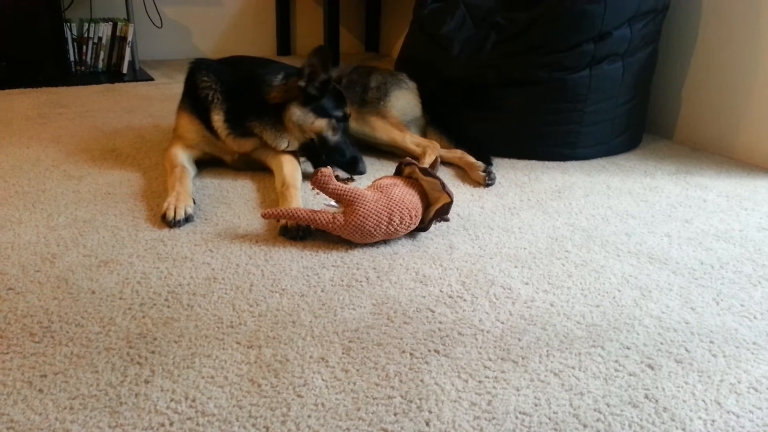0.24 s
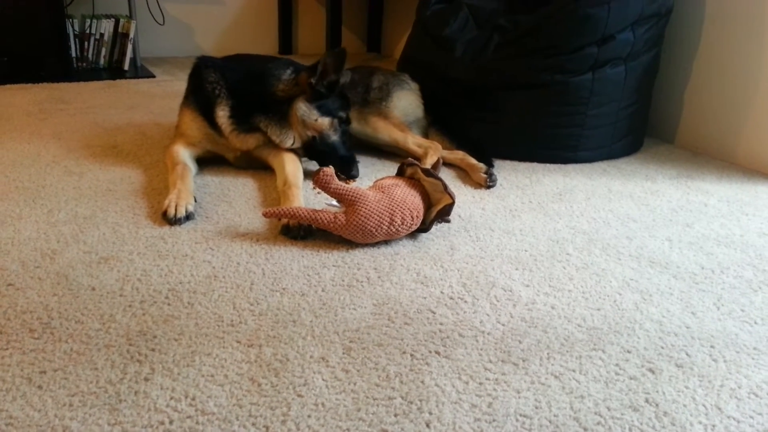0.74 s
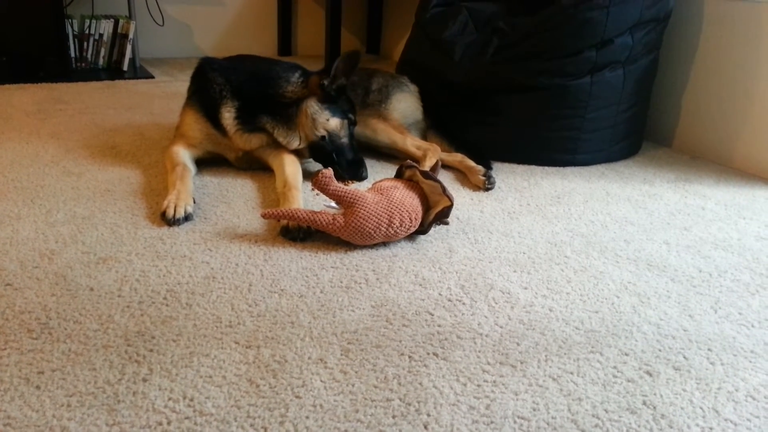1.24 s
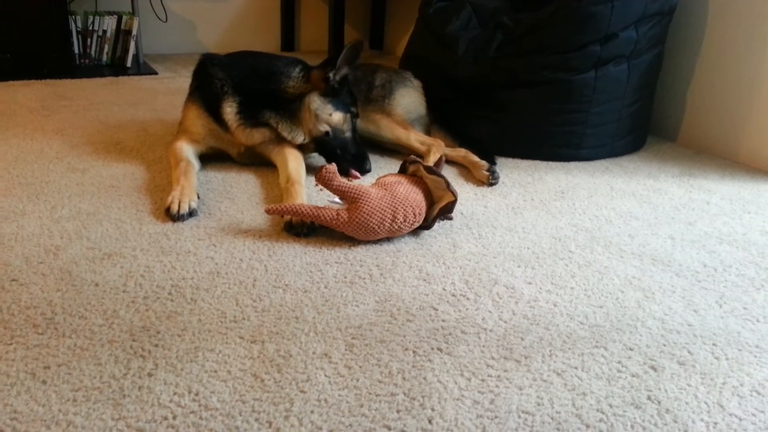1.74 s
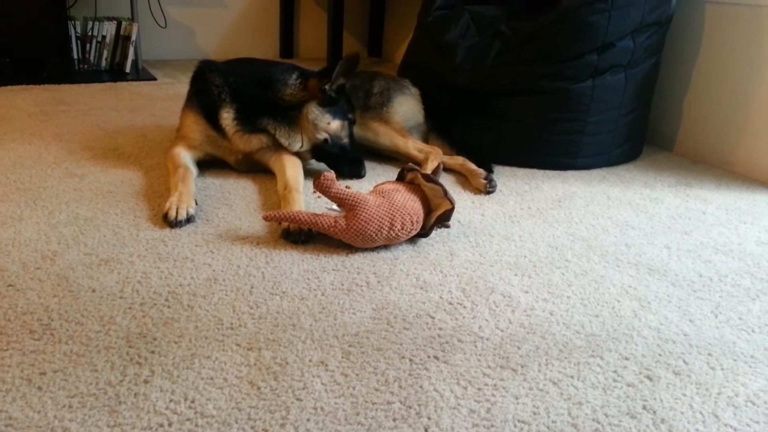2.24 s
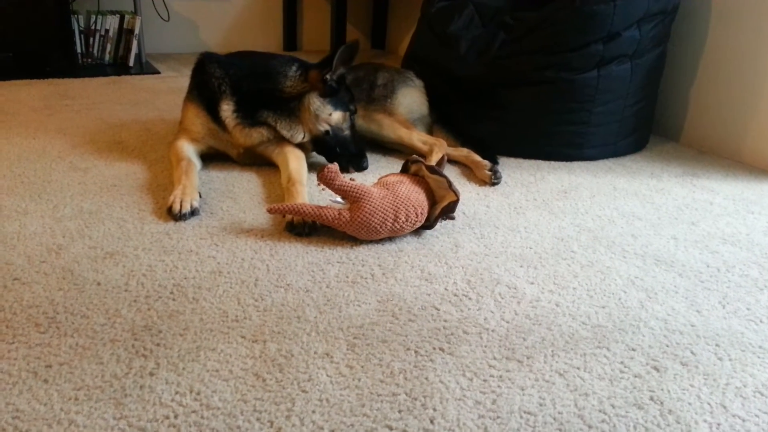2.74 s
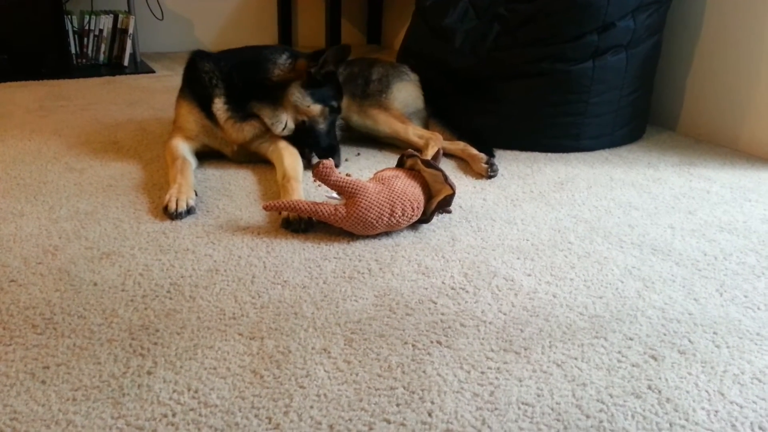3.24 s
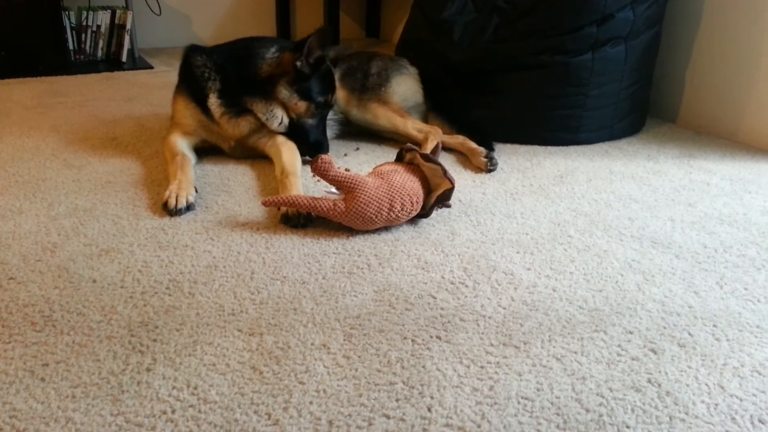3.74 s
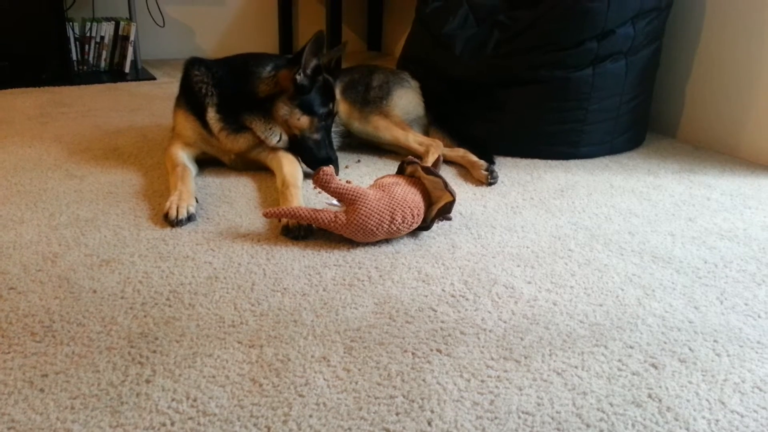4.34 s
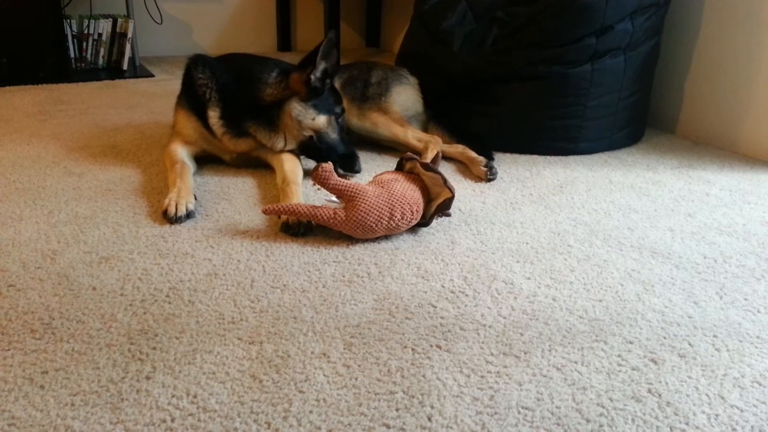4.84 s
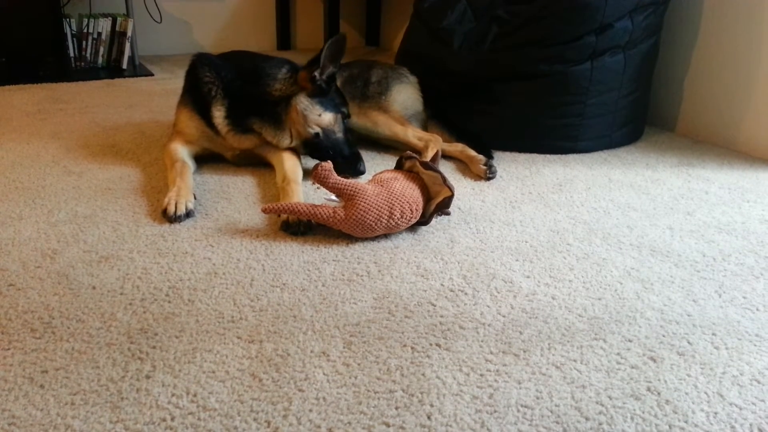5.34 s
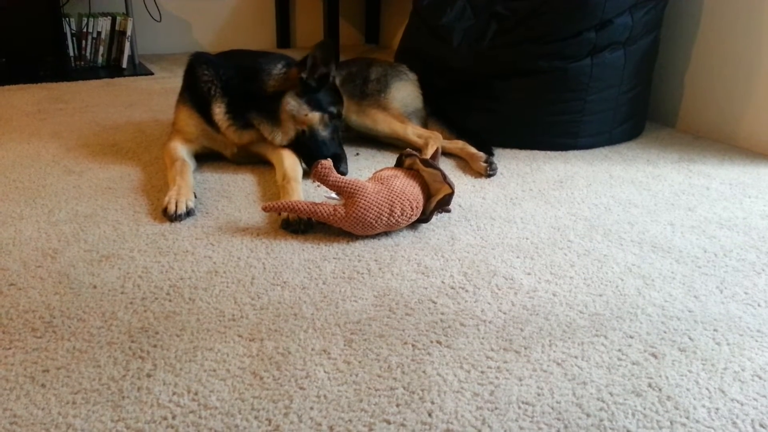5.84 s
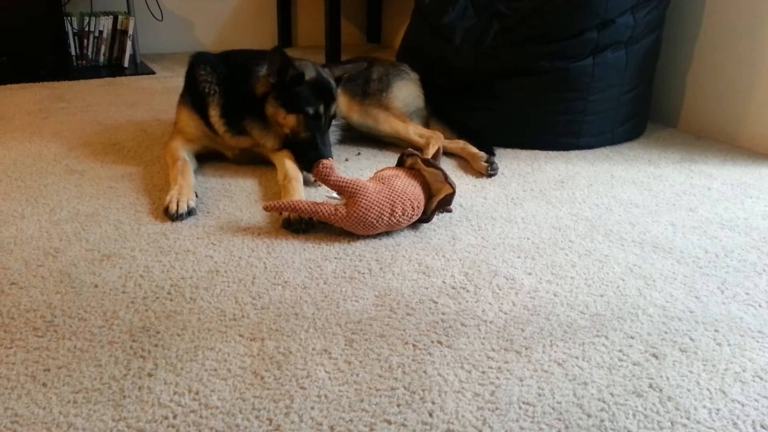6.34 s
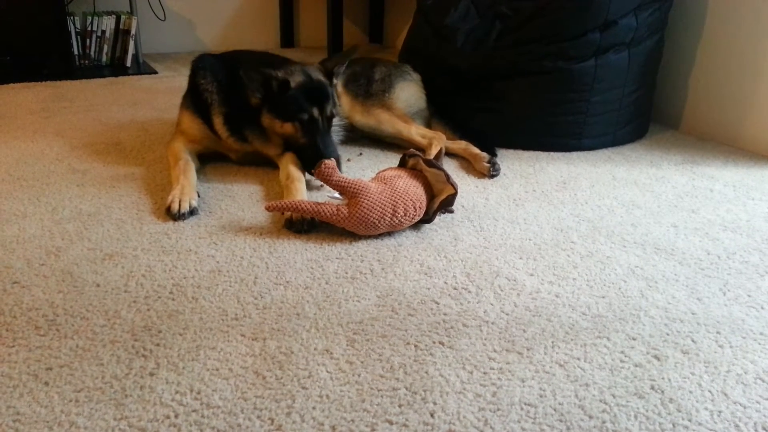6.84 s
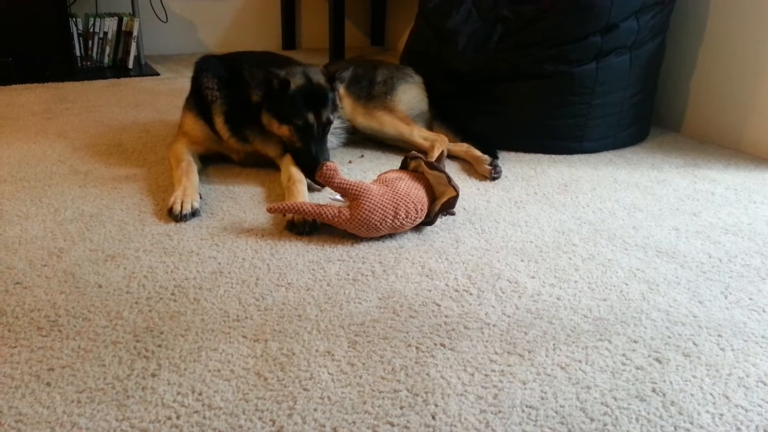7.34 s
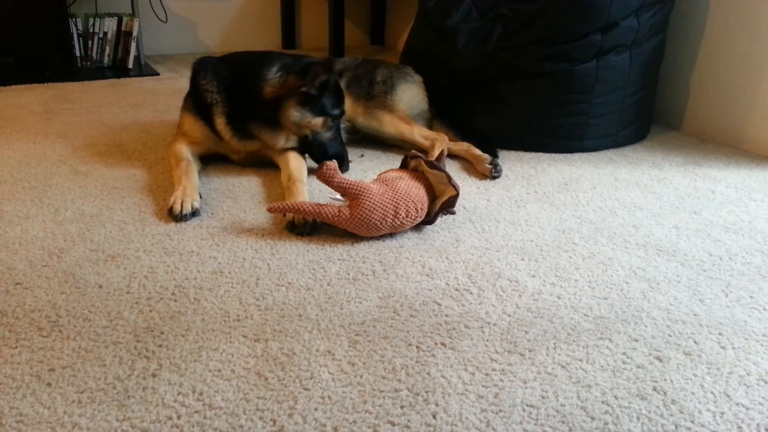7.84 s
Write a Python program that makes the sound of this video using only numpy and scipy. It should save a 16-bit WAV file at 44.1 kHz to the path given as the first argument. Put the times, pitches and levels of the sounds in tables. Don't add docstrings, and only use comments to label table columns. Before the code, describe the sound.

Indoors on carpet, a dog bites hard dry food: a few crisp snaps, then one large piece cracks loudly and crumbles in dense brittle crackle. Afterwards only scattered light clicks and nibbles remain, with soft dull paw or jaw thumps. A low, uneven duct drone and faint hiss lie beneath, sinking later. A phone microphone a little way off hears it, with noise suppression opening around bites.

```python
import sys
import numpy as np
from scipy import signal
from scipy.fft import rfft, irfft
from scipy.io import wavfile
from scipy.ndimage import uniform_filter1d, minimum_filter1d

SR = 44100
rng = np.random.default_rng(int(sys.argv[2]) if len(sys.argv) > 2 else 0)


def store_wav(level_fs):
    pcm = np.round(np.clip(np.atleast_2d(level_fs), -1, 1) * 32767)
    wavfile.write(sys.argv[1], SR, pcm.T.astype(np.int16))


def attenuation_scalar(level_db):
    decades = np.asarray(level_db, float) / 20
    return 10 ** decades


N = 356460

# pitch in Hz, width in Hz, level in dB.
FOOD_BODY = [(1265, 360, -5), (2385, 750, -4), (3460, 830, -4.5), (4500, 1300, -0.8), (6500, 1100, -3),
             (9900, 9800, -9.5)]
HOLLOW_MODES, BRIGHT_MODES = FOOD_BODY[:2], FOOD_BODY[2:]
# start in seconds,
# peak in dB, ring in Hz, breadth in dB, knock in dB.
CRACKS = [(0.4444, -21, 4910, -3, -8), (0.4789, -39, 2890, -4, 0), (0.4841, -35, 2200, -4, -3),
          (0.599, -19, 7880, 2, -8), (0.6029, -27, 5510, -3, -7), (0.6082, -23, 4610, -1, -12),
          (0.6436, -37, 8140, -5, -14), (0.6475, -36, 7360, -3, -14), (0.7057, -30, 2200, 1, -7),
          (0.7204, -26, 5250, -11, -16), (0.7236, -18, 7190, 1, -25), (0.7381, -25, 4820, 1, -14),
          (0.7574, -24, 7360, 0, -20), (0.7652, -22, 2630, -2, -5), (0.7719, -15, 3830, -5, -13),
          (0.7824, -28, 5170, -11, -14), (0.785, -19, 7190, -4, -20), (0.7948, -11, 6240, -2, -23),
          (0.8012, -15, 3920, -1, -15), (0.8072, -29, 7710, 0, -9), (0.8276, -29, 6630, -1, -21),
          (0.8422, -32, 4780, -10, -16), (0.8992, -43, 2330, -16, -2), (0.9363, -44, 3750, -12, -8),
          (0.9848, -41, 6850, -6, -19), (1.0401, -47, 6850, -1, -10), (1.5448, -16, 8140, -2, -16),
          (1.5527, -39, 5640, -7, -16), (1.5595, -38, 6240, -4, -14), (1.6433, -48, 6890, 0, -9),
          (1.7756, -32, 8610, -13, -15),
          (1.8052, -24, 7410, -3, -11), (1.8112, -19, 7020, -1, -19), (1.8237, -22, 5040, -5, -13),
               (1.8273, -24, 7490, -6, -18), (1.8457, -29, 5470, 2, -12), (1.8515, -27, 7490, 0, -15),
               (1.876, -21, 5300, 0, -12), (1.8814, -22, 7150, -4, -14), (1.89, -17, 5990, -2, -12),
               (1.8982, -10, 4440, -4, -18), (1.9077, -18, 4480, -5, -11), (1.9543, -17, 5120, -6, -20),
               (1.9604, -17, 5250, -7, -17), (1.9894, -6, 5040, -4, -20), (2.0001, -15, 4910, -5, -15),
               (2.0041, -12, 4820, -10, -19), (2.0087, -14, 4690, -12, -15), (2.0128, -10, 7110, 0, -19),
               (2.0178, -13, 4180, -4, -14), (2.0267, -5, 7110, -2, -20), (2.0443, -8, 4260, -1, -11),
               (2.0585, -14, 4650, -7, -18), (2.064, -6, 7150, 1, -12), (2.0696, -10, 4690, -4, -10),
               (2.0767, -7, 6930, -1, -20), (2.0851, -15, 2370, -4, -5), (2.1147, -9, 5600, 1, -19),
               (2.1212, -16, 7110, -5, -26), (2.1255, -20, 5040, -6, -13), (2.1496, -2, 5470, -3, -28),
               (2.1595, -20, 5380, -6, -19), (2.1676, -21, 7150, 0, -20), (2.1741, -10, 4520, -3, -11),
               (2.185, -24, 6200, -3, -20),
          (2.2212, -28, 4130, -6, -8), (2.2292, -17, 5120, -4, -8), (2.2353, -32, 6720, 0, -14),
             (2.2636, -18, 4570, -17, -23), (2.2782, -21, 4690, -14, -18), (2.2864, -33, 5210, -10, -14),
             (2.2993, -20, 7110, 1, -15), (2.3048, -18, 3920, 1, -7), (2.3126, -33, 5300, -14, -12),
             (2.3225, -20, 5000, -4, -15), (2.3304, -32, 5210, -9, -15), (2.3648, -37, 2450, -7, 1),
             (2.3763, -22, 7670, -1, -20), (2.3943, -38, 3060, -7, -4), (2.4143, -22, 6930, 0, -15),
             (2.4519, -15, 4310, -7, -17), (2.4602, -35, 5380, -13, -13), (2.4638, -22, 5040, -4, -12),
             (2.4725, -35, 4950, -12, -17), (2.4802, -24, 6980, -2, -18), (2.5012, -19, 5380, 1, -6),
             (2.5044, -23, 2370, -5, -3), (2.509, -30, 2330, -5, -2), (2.513, -25, 6630, 0, -14),
             (2.5229, -21, 7360, -1, -15), (2.5302, -30, 6800, -3, -7), (2.5462, -28, 5170, 1, -10),
             (2.5603, -15, 6890, -5, -18), (2.5682, -34, 5470, -7, -16), (2.5794, -22, 6980, 1, -13),
             (2.5908, -16, 5380, -1, -19), (2.5943, -21, 5000, 0, -16), (2.5976, -23, 3830, -3, -13),
             (2.627, -29, 7020, -2, -20), (2.6303, -31, 7020, -6, -11), (2.6499, -35, 2020, 0, -7),
             (2.6689, -35, 7920, 1, -9),
          (2.8338, -23, 4050, 1, -6), (2.9397, -46, 7060, -3, -17), (3.0934, -28, 4910, -2, -6),
               (3.0967, -41, 6800, -6, -10), (3.2098, -39, 6420, -3, -16), (3.8014, -41, 7880, -3, -11),
               (3.9496, -35, 6160, -4, -17), (3.9547, -32, 7710, -7, -18), (4.0169, -45, 7190, -3, -17),
               (4.2898, -49, 7920, -3, -8), (5.0858, -43, 8350, -3, -15), (5.1653, -44, 5430, -4, -11),
               (5.2358, -46, 5730, -8, -3), (5.302, -33, 5770, -3, -12), (5.3056, -33, 5680, -6, -13),
               (5.321, -38, 5680, -3, -12), (5.334, -41, 6550, -7, -16), (5.3379, -42, 6720, -2, -11),
               (5.3414, -38, 5940, -9, -15), (5.3454, -42, 5770, -9, -13), (5.3716, -40, 5640, -16, -20),
               (5.3745, -45, 5510, -9, -15), (5.3892, -40, 5430, -13, -18),
          (5.6231, -44, 7410, -5, -17), (5.6464, -44, 8180, -2, -16), (5.9328, -33, 7320, -4, -21),
               (5.9442, -42, 8050, -3, -11), (6.0779, -36, 6500, -13, -27), (6.0909, -46, 6330, -6, -11),
               (6.1794, -48, 2020, -8, -3), (6.2374, -48, 6460, -7, -19), (6.3641, -45, 8350, -1, -15),
               (6.5236, -51, 6630, -2, -14), (6.5924, -33, 6500, -9, -11), (6.6003, -42, 5770, -8, -7),
               (6.7356, -37, 3920, -2, -11), (6.7446, -38, 8100, -2, -4), (6.7868, -43, 4010, -9, -15),
               (6.7948, -39, 3100, -1, -5), (6.8588, -21, 4010, -6, -13), (6.865, -36, 7110, 0, -19),
               (6.9811, -47, 7840, -5, -19), (7.2657, -33, 4650, -9, -12), (7.2707, -32, 4650, -13, -23),
               (7.2757, -35, 6240, -12, -15), (7.2866, -40, 4870, -14, -16), (7.65, -43, 8440, -2, -19),
               (8.0653, -34, 6800, -13, -24),
          (.754, -27, 7600, -3, -18), (1.5432, -26, 7700, -4, -20), (2.147, -20, 7200, -3, -25),
         (2.151, -7, 3400, -8, -28), (3.0955, -30, 10500, -6, -25), (5.3047, -36, 11000, -6, -25)]


def cracks(width_hz=2700, bright_db=-5.5, narrows=.4, knock_db=-0.8):
    rise_s, splinter_s, tail_s, tail_db = .0007, .0006, .009, -32
    length = 1300
    t = np.arange(length) / SR
    out = np.zeros((2, N + 4096))
    events = CRACKS
    for s, peak_db, hz, breadth_db, hollow_db in events:
        noise = rng.standard_normal((2, length))
        breaks = rng.random((2, length)) < .3
        tail = attenuation_scalar(tail_db) * noise * np.exp(-t / tail_s)
        splinters = noise * breaks * np.exp(-t / splinter_s) + tail
        splinters = splinters * (1 - np.exp(-t / rise_s))
        energy = np.sum(splinters ** 2, axis=1, keepdims=True)
        splinters = pair(splinters / np.sqrt(energy), 0.35)

        wide = width_hz * attenuation_scalar(narrows * breadth_db)
        ring = resonate(resonate(splinters, hz, wide), hz, wide)
        bright = attenuation_scalar(bright_db + breadth_db) * body(splinters, BRIGHT_MODES)
        sharp = shaded(ported(ring + bright))
        knock = hollow(pair(splinters[::-1], 0.7))
        crack = sharp / np.abs(sharp.mean(axis=0)).max()
        crack = crack + attenuation_scalar(hollow_db + knock_db) * knock / np.abs(knock).max()
        at = round((s - .4 * rise_s) * SR)
        out[:, at:at + length] += attenuation_scalar(peak_db - 0.7) * crack
    band = signal.butter(3, [950, 14800], "band", fs=SR, output="sos")
    return signal.sosfilt(band, out[:, :N])


def crackle(level_db, deep_db, clump_db=2.4, shift_db=2.2):
    per_s, uneven_db = 9000, 3
    sizes = attenuation_scalar(uneven_db * np.minimum(rng.exponential(1, (2, N)), 4))
    sizes = sizes * rng.choice([-1, 1], (2, N))
    clumps = attenuation_scalar(clump_db * drift(150))
    grains = clumps * sizes * (rng.random((2, N)) < per_s / SR) + 1e-18
    rung = attenuation_scalar(3.5 + deep_db + shift_db * drift(1200)) * hollow(pair(grains, 0.8))
    for k, (hz, width_hz, db) in enumerate(BRIGHT_MODES):
        gain = attenuation_scalar(db + deep_db * (hz < 5500) + shift_db * drift(2500))
        alike = np.clip(1.3 - hz / 4000, 0, 1)
        rung += (-1) ** k * gain * resonate(pair(grains, alike), hz, width_hz)
    band = signal.butter(8, [1000, 13000], "band", fs=SR, output="sos")
    rung = signal.sosfilt(band, shaded(ported(rung)))
    return attenuation_scalar(level_db - 9.2) * rms_one(rung)


# start in seconds, held time in seconds, crackle in dB, suppressor opening in dB.
BITES = [(-.011, .04, -40, 6), (0.309, 0.031, -51, 8.5), (.441, .04, -44, 12), (0.59, 0.071, -29.5, 13.5),
         (.701, .145, -31, 19), (.94, 0.14, -52, 4.5), (1.53, 0.057, -50, 11.5), (1.63, 0.02, -58, 3.5),
         (1.775, .56, -57, 12), (2.456, .23, -60, 6), (2.831, 0.037, -57, 6), (3.088, 0.027, -56, 6),
         (3.2, 0.032, -58, 9), (3.58, 0.023, -64, 6.5), (3.791, 0.024, -53, 10), (3.941, 0.016, -46, 8),
         (4.01, 0.025, -66, 0.5), (4.289, 0.026, -66, 5.5)]
NIBBLES = [(5.07, .028, -65, 9), (5.159, 0.1, -57, 16), (5.289, 0.11, -57, 14), (5.59, 0.063, -63, 12.5),
           (5.922, 0.038, -48, 15), (6.02, .021, -71, 4), (6.075, 0.029, -53, 12.5), (6.16, 0.083, -70, 8),
           (6.35, .023, -72, 8), (6.44, .026, -73.5, 3.5), (6.52, 0.026, -68, 12), (6.589, 0.03, -48, 19),
           (6.718, .085, -41, 15), (6.837, 0.06, -57, 14.5), (6.97, 0.027, -58, 10.5),
           (7.25, .075, -46, 14), (7.379, 0.026, -68, 1), (7.54, 0.023, -70.5, 0.5), (7.631, 0.077, -68, 7),
           (8.051, .042, -50, 11.5)]
# time in seconds, crackle in dB, depth in dB.
CRUNCH = [(1.76, -62, -6), (1.79, -40, -3), (1.81, -24, -2), (1.858, -31, 0), (1.888, -18, 0),
          (1.98, -16, 0), (2.05, -12, 0), (2.1, -20, 1), (2.14, -27, 0)]
GIVING_WAY = [(2.2, -30, -2), (2.25, -38, -1), (2.33, -38, -1), (2.37, -44, 0), (2.444, -50, -1),
              (2.456, -37, 0), (2.6, -36, -2), (2.7, -50, -3), (2.81, -71, 0)]


def pressure_db(swing_db):
    close_s, give_db_per_s, let_go_db_per_s = .012, 130, 600
    rest_db, rest_follows = -64.5, .9
    t = np.arange(N) / SR
    crunching = (t > CRUNCH[0][0]) * (t < GIVING_WAY[-1][0])
    gain = attenuation_scalar(rest_db + rest_follows * swing_db)
    gain = gain + attenuation_scalar(in_time(CRUNCH + GIVING_WAY)[0]) * crunching
    for s, held, db, _ in BITES + NIBBLES:
        span = slice(max(int(s * SR), 0), int((s + held + .2) * SR))
        since = t[span] - s
        give_db = give_db_per_s * np.maximum(since - close_s, 0)
        let_go_db = let_go_db_per_s * np.maximum(since - held, 0)
        gain[span] += attenuation_scalar(db - (give_db + let_go_db)) * np.clip(since / close_s, 0, 1) ** 2
    return 20 * np.log10(gain)


# time in seconds, depth in dB.
DEPTHS = [(.02, -9), (.33, -2), (.63, 0), (.78, 1.5), (1.57, -5), (5.34, -3), (5.94, -4), (6.09, -4),
          (6.61, 0), (6.76, 0), (6.88, 0), (7.29, 2), (8.07, -4)]


def depth_db():
    started = np.arange(N) / SR > CRUNCH[0][0]
    return in_time(CRUNCH + GIVING_WAY)[1] * started + bells(*np.transpose(DEPTHS), .04)


def hollow(x):
    return sum(attenuation_scalar(db) * resonate(resonate(x, hz, w), hz, w) for hz, w, db in HOLLOW_MODES)


# start in seconds, pitch in Hz, level in dB.
THUMPS = [(.7, 700, -51.5), (.79, 380, -65), (2.03, 350, -48.5), (2.635, 380, -46), (3.789, 383, -53),
          (5.28, 508, -57), (5.589, 630, -65), (6.171, 380, -56.5), (6.182, 724, -75), (6.44, 405, -66.5),
          (7.385, 397, -64), (7.545, 402, -65.5), (7.95, 294, -61)]


def thumps(rise_s=0.0048, fall_s=0.024, width_hz=220):
    length = 6000
    t = np.arange(length) / SR
    swell = (1 - np.exp(-t / rise_s)) * np.exp(-t / fall_s)
    out = np.zeros((2, N + 8192))
    for s, hz, db in THUMPS:
        puff = rms_one(resonate(pair(rng.standard_normal((2, length)), .7), hz, width_hz))
        at = round(s * SR)
        out[:, at:at + length] += attenuation_scalar(db + 8) * puff * swell
    return out[:, :N]


# pitch in Hz, width in Hz, level in dB.
ROOM_MODES = [(36.04, 31, -22), (69, 35, -11), (108, 16, -3.5), (143, 32, -8), (180, 16, -10.5),
              (208, 15, -10), (246, 28, -10.5), (289.4, 27, -15)]
# time in seconds, level in dB.
NEIGHBOURS = [(0, -5), (.6, -4), (.85, 1), (1.1, -3), (1.8, -2), (2.1, 1), (3.2, 1), (3.5, -5), (4.8, -7),
              (5.2, 0), (8.08, 0)]
FULL_FLOW_DB = -58


def drone(swing_db, low_gust_db, upper_gust_db, rumble_db):
    low_db = -55.5 + .85 * swing_db + low_gust_db
    flow_upper_db = -48.5 + 1.26 * swing_db
    upper_db = flow_upper_db + upper_gust_db
    beside_db = flow_upper_db - 4.0 + in_time(NEIGHBOURS)[0] + .3 * upper_gust_db
    deepest_db = rumble_db - 9.0 + .5 * (rumble_db - FULL_FLOW_DB)

    air = pair(rng.standard_normal((2, N)), 0.91)
    rung = [attenuation_scalar(db) * rms_one(resonate(resonate(air, hz, w), hz, w)) for hz, w, db in ROOM_MODES]
    deepest = attenuation_scalar(deepest_db) * rms_one(rung[0])
    low = attenuation_scalar(low_db + 1.46) * rms_one(sum(rung[1:4]))
    beside = attenuation_scalar(beside_db) * rms_one(rung[4] + rung[6] + rung[7])
    blade_air = .55 * rms_one(rung[5])
    upper = attenuation_scalar(upper_db - 2.5) * rms_one(blade_air + fan())
    return deepest + low + beside + upper


def fan():
    fan_hz, wander_hz, level_db = 207.5, 4, -1.5
    turns = np.cumsum(fan_hz + wander_hz * drift(2500)) / SR
    return np.sqrt(2) * attenuation_scalar(level_db + 2.2 * drift(2000)) * np.sin(2 * np.pi * turns)


# time in seconds, low drone gain in dB, upper drone gain in dB.
GUSTS = [(.05, -2, -5), (.2, 1.5, -11), (.43, -1, 4), (.58, 3, 5), (.86, 1, -7), (1.03, 0, 3),
         (1.1, -4, -4), (1.19, 6, -1.5), (1.3, -2, -5), (1.46, 2, 2), (1.73, 1, -7.5), (1.9, -2, -5),
         (2.3, 1, -5), (2.53, -3, 4), (2.63, 2, -5), (3.25, 3, 5), (3.34, -7, -8), (3.41, -2, 4),
         (3.45, 5, -6), (3.49, -7, 6), (3.56, 0, -6), (3.69, 6, 3), (3.981, 3.5, -4), (4.16, 3.5, 4),
         (4.27, -2, 3.5), (4.36, -6, 2), (4.47, -8, -6), (4.62, 5, 4), (4.68, 4, 3), (4.77, -3, -6),
         (4.88, 5, 1), (4.96, -4, -5), (5.29, 2, 3), (5.745, 12, 5), (5.93, 5, 0.5), (6.2, 4, 4),
         (6.62, 12.5, 4.5), (6.86, 10.5, 2.5), (7.23, 8, -1), (7.29, 6.5, 11)]


def gusts_db():
    gust_s = 0.03
    s, low_db, upper_db = np.transpose(GUSTS)
    return bells(s, low_db, gust_s), bells(s, upper_db, gust_s)


# frequency in Hz, level in dB per Hz.
RUMBLE = [(180, -31), (300, -1), (392, -6), (539, -5.5), (676, -9.5), (822, -10.5), (3500, -32),
          (4550, -52.5), (7700, -120)]


def rumble(rumble_db, opened_db):
    return attenuation_scalar(rumble_db + 3.0 + 0.34 * opened_db) * coloured(RUMBLE, 0.55)


# frequency in Hz, level in dB per Hz.
HISS = [(410, -30.5), (700, -4), (2140, -9), (5900, -14), (7900, -15.5), (11000, -12), (14500, -15),
        (16000, -19.5)]


def hiss(swing_db, opened_db):
    rest_db, follows = -79.5, 0.49
    level_db = rest_db + follows * np.minimum(swing_db, 0) + 12.5 + opened_db
    return ported(attenuation_scalar(level_db) * coloured(HISS, 0.026))


def whine():
    hz, level_db, fade_db_per_s, ends_s = 10002, -78.5, .7, 4.05
    t = np.arange(N) / SR
    wobble = attenuation_scalar(1.5 * drift(1500))
    level = attenuation_scalar(level_db - fade_db_per_s * t) * (t < ends_s)
    return np.sqrt(2) * level * wobble * np.sin(2 * np.pi * hz * t)


# time in seconds, air flow in dB.
LET_THROUGH = [(0, -57.5), (1.1, -58), (2.02, -53.5), (3.87, -57), (4.34, -59), (4.48, -66.5), (4.55, -58),
               (4.88, -63), (5.04, -68), (5.29, -67), (5.5, -72), (5.87, -73), (6.5, -72.5), (6.86, -68),
               (7.16, -75), (7.3, -71.5), (7.79, -72), (8.08, -66.5)]


def let_through_db():
    return in_time(LET_THROUGH)[0]


def suppressor_db():
    open_s, close_s, sag_per_s = .008, .016, 2.5

    def opening(t):
        total = 0
        for s, held, _, db in BITES + NIBBLES:
            sag = sag_per_s * np.clip(t - s, 0, held)
            closing = np.maximum(t - s - held, 0) / close_s
            total = total + db * np.clip((t - s) / open_s, 0, 1) * np.exp(-sag - closing)
        return total

    return smooth(opening)


# pitch in Hz, width in Hz, level in dB.
PORTS = [(5200, 2400, 4), (7136, 990, 10.5)]


def ported(stereo):
    return np.array([x + attenuation_scalar(db) * resonate(x, hz, w) for x, (hz, w, db) in zip(stereo, PORTS)])


def shaded(x, cut_hz=6000):
    left = signal.lfilter(*signal.butter(1, cut_hz, fs=SR), x[0])
    return np.array([left * attenuation_scalar(0.5), x[1]])


def resonate(x, hz, width_hz):
    r = np.exp(-np.pi * width_hz / SR)
    b = (1 - r * r) / 2 * np.array([1, 0, -1])
    return signal.lfilter(b, [1, -2 * r * np.cos(2 * np.pi * hz / SR), r * r], x)


def body(x, modes):
    return sum((-1) ** k * attenuation_scalar(db) * resonate(x, hz, w) for k, (hz, w, db) in enumerate(modes))


def pair(draw, alike):
    alike = np.clip(alike, 0, 1)
    opposed = draw[1] * np.array([[1], [-1]])
    return np.sqrt(1 + alike) * draw[0] + np.sqrt(1 - alike) * opposed


def coloured(spectrum, alike):
    hz, db = np.transpose(spectrum)
    grid = np.maximum(np.arange(N // 2 + 1) * SR / N, 1)
    shape = attenuation_scalar(np.interp(np.log(grid), np.log(hz), db))
    noise = pair(rng.standard_normal((2, N)), alike)
    return rms_one(irfft(rfft(noise) * shape, N))


def drift(span):
    return rms_one(uniform_filter1d(rng.standard_normal(N), size=span))


def rms_one(x):
    return x / np.sqrt(np.mean(x ** 2) + 1e-20)


def in_time(rows):
    s, *columns = np.transpose(rows)
    return [np.interp(np.arange(N) / SR, s, c) for c in columns]


def smooth(shape):
    t = np.arange(0, N + 32, 32) / SR
    return np.interp(np.arange(N) / SR, t, shape(t))


def bells(s, db, width_s):
    return smooth(lambda t: sum(d * np.exp(-.5 * ((t - at) / width_s) ** 2) for at, d in zip(s, db)))


def scene():
    flow_db = let_through_db()
    swing_db = flow_db - FULL_FLOW_DB
    opened_db = suppressor_db()
    low_gust_db, upper_gust_db = gusts_db()
    food = thumps() + cracks() + crackle(pressure_db(swing_db), depth_db())
    rumble_db = flow_db + 0.35 * low_gust_db
    air = drone(swing_db, low_gust_db, upper_gust_db, rumble_db) + rumble(rumble_db, opened_db)
    air = air * attenuation_scalar(np.array([[1.3], [-1.3]]))
    return food + air + hiss(swing_db, opened_db) + whine()


def starved(x):
    limit_db, top_hz, frame = -50, 13000, 512
    high = signal.butter(2, 3000, "high", fs=SR, output="sos")
    power = signal.sosfilt(high, x.mean(axis=0)) ** 2
    lasting = minimum_filter1d(uniform_filter1d(power, size=150), size=400)
    frames = np.repeat(lasting[::frame], frame)[:N] > attenuation_scalar(2 * limit_db)
    clicks = uniform_filter1d(power, size=100) > 40 * lasting
    kept = signal.sosfiltfilt(signal.cheby2(10, 30, top_hz, fs=SR, output="sos"), x)
    share = uniform_filter1d((frames & ~clicks) * 1., size=128)
    return x + share * (kept - x)


def band_limit(x):
    return signal.sosfilt(signal.butter(12, 15300, fs=SR, output="sos"), x)


def record(dry):
    rounded = 1.1 * np.tanh(dry / 1.1)
    cut = signal.sosfilt(signal.cheby2(14, 35, 15000, fs=SR, output="sos"), rounded)
    return band_limit(starved(cut))


dry = scene()
out = record(dry)
store_wav(out)
```